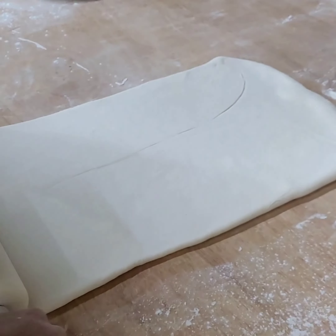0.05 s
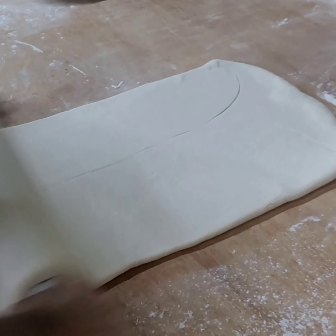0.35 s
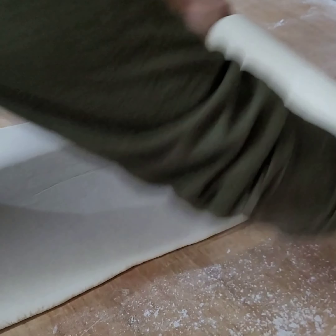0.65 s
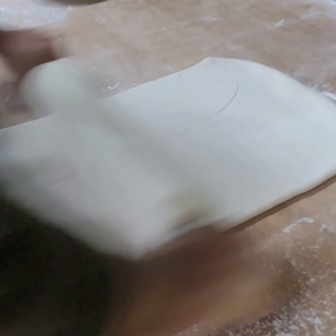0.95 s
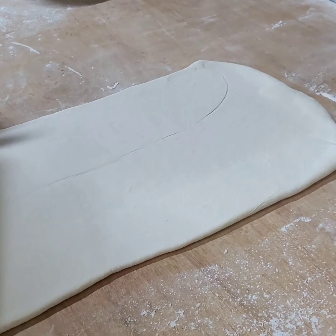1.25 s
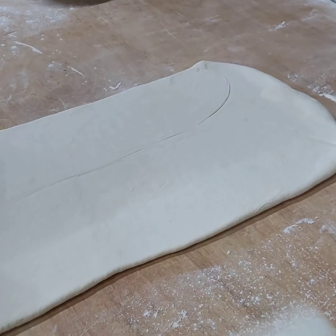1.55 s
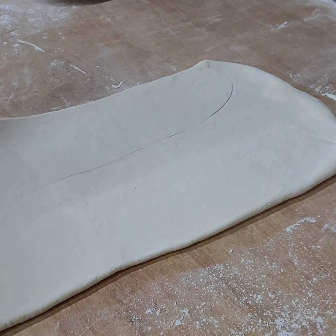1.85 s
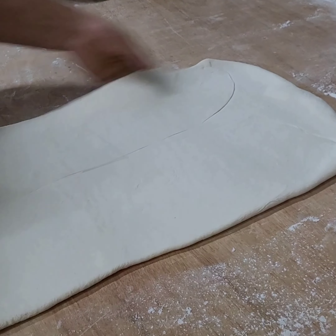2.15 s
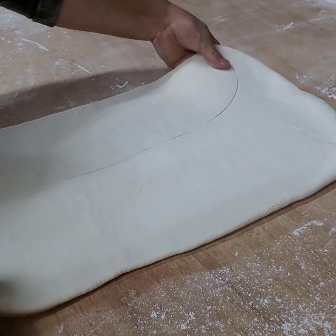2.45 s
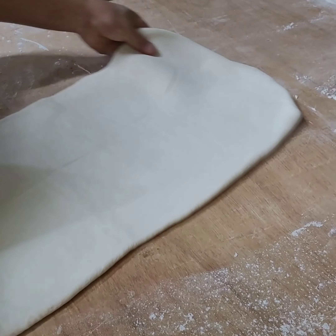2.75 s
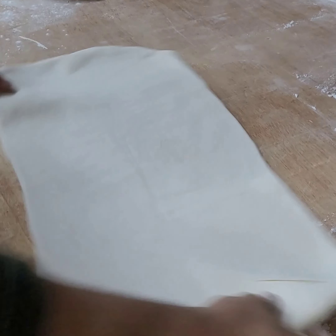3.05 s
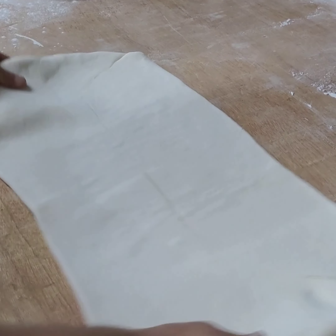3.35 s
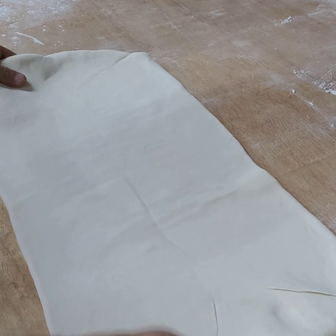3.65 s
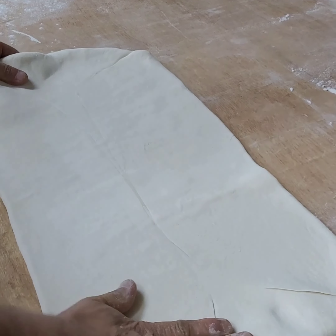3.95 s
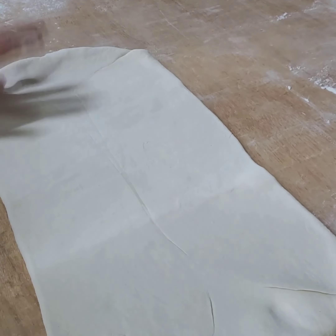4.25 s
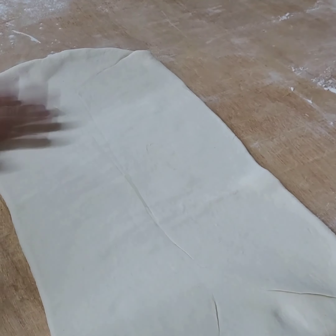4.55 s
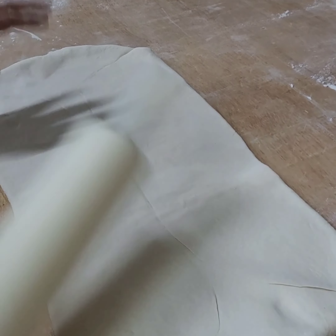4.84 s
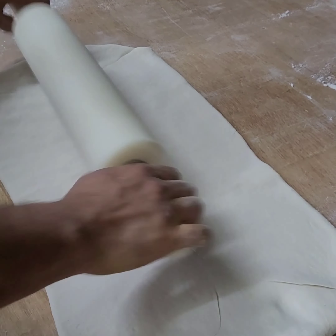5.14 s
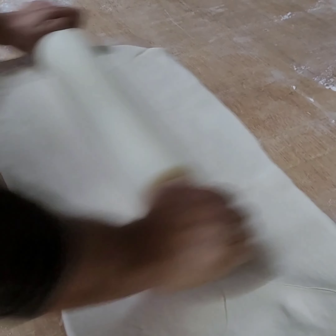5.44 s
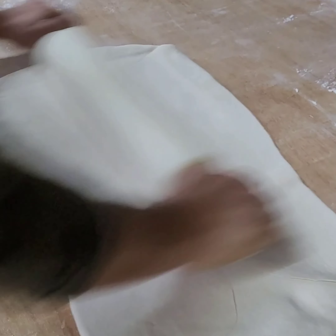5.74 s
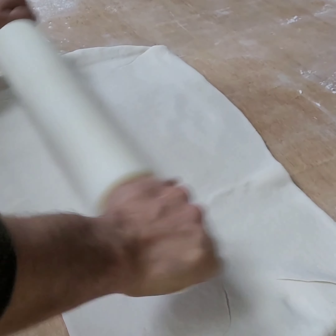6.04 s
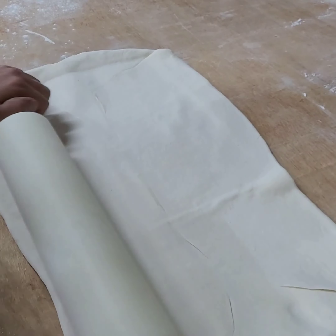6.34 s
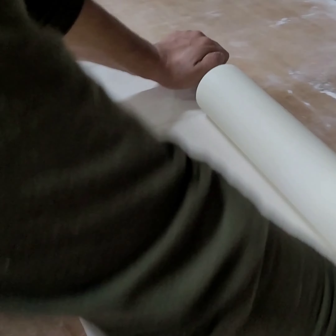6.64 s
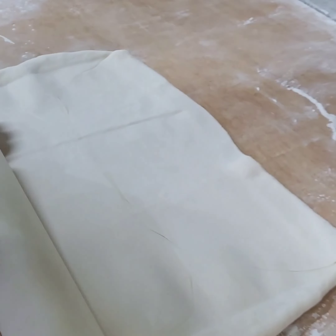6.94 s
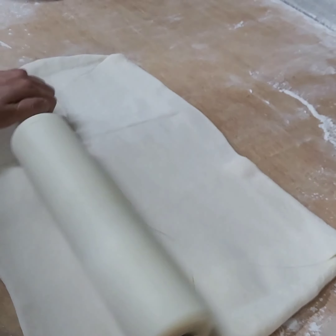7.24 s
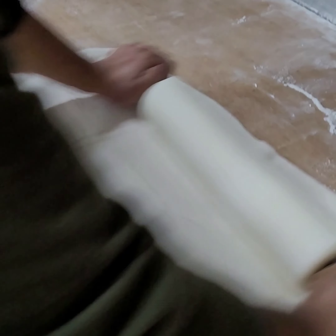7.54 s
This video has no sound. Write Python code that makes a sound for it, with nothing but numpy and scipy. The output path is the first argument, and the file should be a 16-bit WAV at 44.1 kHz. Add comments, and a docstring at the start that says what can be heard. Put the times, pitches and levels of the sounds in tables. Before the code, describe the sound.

Heard from nearby in a small, hard-walled kitchen, dough is rolled out on a wooden table. A few rubbing strokes and light taps lead to a clattering knock of the rolling pin. After a quieter stretch of sliding over flour, pin and dough land several times with a slap and a thud, mixed toward the end with brief gritty rolls and clicks. An appliance hums faintly throughout.

```python
"""Rolling out dough

A wooden rolling pin works floured dough on a wooden table in a small, hard-walled kitchen.
The pin lands with a slap and a thud of the table, and rolls with a gritty rub and sticky clicks.
Between strokes, hands and dough slide over the flour. The room echoes, and an appliance hums."""
import sys
import numpy as np
from scipy import signal
from scipy.fft import rfft, irfft, next_fast_len
from scipy.io import wavfile

SR = 44100
rng = np.random.default_rng(int(sys.argv[2]) if len(sys.argv) > 2 else 0)


def wrap_up_sound(samples):
    """Save the sound to the file named by the first command line argument, as 16-bit audio."""
    columns = np.atleast_2d(samples).T
    # keep every value between -1 and 1, then stretch to whole-number steps
    tamed = np.clip(columns, -1, 1)
    steps = np.round(tamed * 32767).astype(np.int16)
    wavfile.write(sys.argv[1], SR, steps)


N = 334719
TIME = np.arange(N) / SR
TAPS = 4096  # samples in a filter or a short sound
HZ = np.fft.rfftfreq(TAPS, 1 / SR)
# the pin's own notes, damped by hands and dough: f/Hz, width/Hz, level/dB
PIN_NOTES = [(1684.6, 320, 4.5), (2594, 650, 1), (4430, 930, 3), (5130, 700, 1.5)]


def knocks(low_hz=150, spot_t60=0.031, chatter_t60=0.22, slap_delay_s=0.001013, room_db=-1):
    """A blow makes the table ring; the longer the dough cushions it, the duller the thud."""
    # pin or hand lands: t/s, thud/dB, extra bass/dB, contact/ms, ring of the struck spot/Hz, ring/dB,
    # chatter/dB, slap/dB, slap fade/ms, slap brightness/(dB per octave)
    landings = [(0.269, -21, 6, 0.5, 440, -30, -32, -42, 3.1, 4),
                (1.475, -37, 13, 0.44, 1080, -30, -32, -20, 7.6, 2.5),
                (1.726, -11, -33, 0.14, 265, -5.5, -15, -30, 8.8, 9),
                (1.729, -17, -12, 0.26, 536, -7, -14, -21, 6.7, 6.5),
                (3.8716, -4.5, -10, 0.57, 279, -6.5, -22, -18, 7.4, -2.5),
                (4.3378, -3.5, -12, 0.84, 394, -12, -23.5, -21, 5.8, -3),
                (4.607, -10, -9, 0.37, 626, -15, -26.5, -23.5, 4.2, -2.5),
                (5.2526, -4, 2.5, 0.85, 336, -14, -25.5, -18, 5.6, -0.3),
                (6.272, -2, 1.5, 0.78, 300, -2, -28, -16, 12, -3.5),
                (7.2758, -4.5, -0.5, 0.88, 323, -14.5, -26.5, -17.5, 12.6, 0)]
    # notes of the table and the air around it: f/Hz, level/dB, t60/s (time to fade by 60 dB)
    table_notes = [(53.5, -28.5, 1.7), (62.7, -14, .14), (102.83, -13.5, 0.7), (133.3, -20, .3),
                   (179.6, -25.5, 0.61), (202.4, -4, 0.026), (253.3, -14.5, 0.32), (285, -1.5, 0.042),
                   (381, -24, 0.22), (468, -24, 0.098), (522, -38, 0.089), (585.6, -23, 0.11),
                   (706, -9, 0.034), (780, -23, 0.16), (1046, -60, 0.073), (1370, -14, 0.082)]
    # tone of the pin chattering on the wood: f/Hz, level/dB
    chatter_tone = [(40, -26.5), (130, -30), (260, -5.5), (400, -2.5), (620, -9), (950, -14.5), (1350, -14),
                    (2500, -27), (6000, -36.5), (16000, -89)]
    out, t = np.zeros((2, N)), np.arange(SR) / SR
    hz, note_db, t60 = np.transpose(table_notes)[:, :, None]
    notes = amp(note_db - 60 * t / t60) * np.sin(2 * np.pi * hz * t)
    lowness = 1 / (1 + (hz / low_hz) ** 4)
    chatter_fade = np.exp(-np.log(1000) * t[:SR // 2] / chatter_t60)
    lead = TAPS / SR / 4  # the dough touches just before the pin bears down
    slap_at = lead + slap_delay_s
    for (s, thud_db, bass_db, contact_ms, spot_hz, spot_db,
         chatter_db, slap_db, slap_ms, tilt) in landings:
        push = t[:TAPS] * 1000 / contact_ms
        force = push * np.exp(-push)
        ring = (notes * amp(bass_db * lowness)).sum(0)
        thud = signal.oaconvolve(ring, force / force.sum())[:SR]
        chatter = colour(noise(SR // 2) * chatter_fade, read(chatter_tone))
        blow = np.zeros((2, SR))
        add(blow, lead, amp(thud_db) * thud)
        add(blow, lead, amp(spot_db) * ping(spot_hz, spot_t60))
        add(blow, slap_at, amp(slap_db) * clack())
        add(blow, lead, amp(chatter_db) * chatter)
        add(blow, *smack(slap_at, slap_db, slap_ms, slap_shape(tilt), rise_ms=4 * contact_ms))
        add(out, s - lead, kitchen(blow, room_db))  # each spot has its own paths through the room
    return out


def clack(clack_db=-4):
    """The pin bends and rings very briefly; the wider a note, the sooner it dies."""
    notes = (amp(db) * ping(hz, np.log(1000) / (np.pi * width)) for hz, width, db in PIN_NOTES)
    return amp(clack_db) * sum(notes)


def smack(s, db, fade_ms, shape_db, rise_ms):
    """Dough lands patch by patch in a quick burst of noise. Returns start time and sound."""
    lead = TAPS // 8
    ms = (np.arange(TAPS) - lead) * 1000 / SR
    swell = np.exp(np.minimum(ms / rise_ms, -ms / fade_ms))
    spectrum = rfft(diffuse(swell * rng.standard_normal((2, TAPS)), shared=0.087))
    burst = irfft(spectrum / abs(spectrum))  # equal strength at every pitch
    burst *= swell ** (1 / 4)
    burst *= np.linalg.norm(swell) / np.linalg.norm(burst[0])
    return s - lead / SR, amp(db) * colour(burst, shape_db)


def slap_shape(tilt):
    """The tone of a slap, in dB: it rings the pin, and a sharper one is brighter."""
    # dough slapping down: f/Hz, level/dB
    slap_tone = [(100, -39.5), (500, -8), (900, 1), (1700, -3), (2700, -0.5), (3500, -5), (4700, -7.5),
                 (7000, -10), (9000, -14), (11500, -5.5), (14000, -9), (18000, -12.5)]
    return read(slap_tone) + pin_colour() + tilt * np.log2(HZ + 1)


def pin_colour():
    """The boost, in dB, that the pin gives to pitches near its own notes."""
    return sum(db / (1 + (2 * (HZ - hz) / width) ** 2) for hz, width, db in PIN_NOTES)


def rolling(rub_db=-1, flour_db=3, rumble_db=-6, sway_db=-27):
    """The pin rubs the dough and crushes flour; the table rumbles and sways under its weight."""
    # pushes and pulls: t/s at full speed, length/s, level/dB, change for the flour's hiss/dB
    rolls = [(0.0, 0.1, -39, -8.5), (0.558, 0.27, -36, -11), (1.022, 0.29, -34.5, -9),
             (5.506, 0.2, -41, -13), (5.801, 0.16, -39, -10.5), (6.137, 0.37, -51.5, -7.5),
             (6.563, .19, -44, -10.5), (6.87, 0.16, -40, -12), (7.539, 0.19, -45.5, -13.5)]
    # tones of rubbed dough, crushed flour, table rumble and table sway: f/Hz, level/dB
    rub_tone = [(200, -28), (450, -36), (560, -6.5), (900, 3), (1350, -3), (1850, -3), (2700, -5.5),
                (3700, -12), (6000, -22.5), (9000, -38), (16000, -34)]
    flour_tone = [(1500, -20), (4000, -5), (6500, 3), (9000, -7), (12500, 5), (16000, 3.5)]
    rumble_tone = [(25, -44), (55, -8), (80, 1), (103, -4.5), (140, -7.5), (215, 2.5), (280, 2.5),
                   (400, 0.5), (520, -8.5), (1000, -9), (4000, -71)]
    sway_tone = [(25, 15.5), (40, 3), (53, 6.5), (70, -3), (85, -16), (104, 7), (140, -7), (400, -31)]
    effort, crush = np.zeros((2, N))
    for s, length, db, hiss_db in rolls:
        arch = amp(db) * stroke(s, length, end_db=-10.5)
        effort += arch
        crush += amp(hiss_db) * arch
    rub = colour(grit(per_s=600, spread_db=5.0, share=0.38), read(rub_tone) + pin_colour()) * effort
    flour = colour(grit(per_s=280, spread_db=4.5, share=0.46), read(flour_tone)) * crush
    rumble = colour(noise(N), read(rumble_tone)) * effort ** 0.83
    sway = colour(noise(N), read(sway_tone)) * effort ** 0.29
    return amp(rub_db) * rub + amp(flour_db) * flour + amp(rumble_db) * rumble + amp(sway_db) * sway


def clicks(tock_db=-10, tock_t60=0.011):
    """Pin and dough tap and stick: small smacks, each with a short woody tock."""
    # light touches: t/s, level/dB, ring/Hz, ring boost/dB, brightness/(dB per octave)
    touches = [(0.028, -37.5, 4340, 17, 3.5), (0.142, -26, 1550, 9, -1), (0.268, -21.5, 1660, 15.5, -2.5),
               (0.346, -35, 4960, 4, 1), (0.456, -30, 1960, 9, -3.5), (0.637, -31, 12600, 4, 2.5),
               (0.896, -30, 4600, 3, -2.5), (0.962, -30, 1910, 18, 1), (1.051, -27, 5500, 1, 1),
               (1.226, -26.5, 1480, 4, 2.5), (4.526, -25, 650, 14, -1.5), (5.039, -37.5, 5100, 10, 1),
               (5.067, -36.5, 2550, -11, 0), (5.989, -38, 4330, 7, -0.5), (6.029, -23, 1430, 6, 0.5),
               (6.161, -37.5, 11400, 8, 1), (6.532, -33, 1990, 13, -1.5), (6.734, -44, 3960, 9, -1.5),
               (6.972, -40, 4400, 12, 1), (7.1, -22, 2570, 3, 0), (7.2803, -22.5, 4400, 2, -0.7)]
    out = np.zeros((2, N))
    for s, db, hz, ring_db, tilt in touches:
        tone = slap_shape(tilt) + ring_db * bump(hz)
        add(out, *smack(s, db, fade_ms=4.26, shape_db=tone, rise_ms=2.45))
        add(out, s, amp(db + ring_db + tock_db) * ping(hz, tock_t60))
    return out


def sliding(slide_db=5, drag_db=-29, scrape_db=4):
    """Hands and dough swish softly over the flour, with a low drag through the table."""
    # each slide: t/s at full speed, length/s, level/dB, pitch of the scrape/Hz
    slides = [(0.374, 0.22, -55.5, 1900), (1.263, 0.39, -60, 1870), (2.137, 0.27, -61.5, 1200),
              (2.396, 0.099, -69, 1490), (2.693, 0.099, -57, 12000), (3.052, 0.36, -50, 5030),
              (3.433, 0.18, -53, 3230), (3.692, 0.25, -57.5, 12800), (4.13, 0.099, -61, 13200),
              (4.5, 0.1, -56, 1500), (5.115, 0.42, -57, 4500), (7.187, 0.062, -50, 11530)]
    # tones of the swish and the drag: f/Hz, level/dB
    swish_tone = [(100, 4), (300, -6), (700, 2), (1500, 3), (3000, 0), (5000, -3.5), (7000, -5.5),
                  (9000, -11.5), (11500, -2), (16000, -3.5)]
    drag_tone = [(40, -46), (100, 4), (160, -5.5), (220, 0), (350, -5), (600, -9), (800, -9), (2000, -28.5)]
    friction = grit(per_s=5300, spread_db=7.5, share=0.098)
    swish, effort = np.zeros((2, N)), np.zeros(N)
    for s, length, db, hz in slides:
        arch = amp(db) * stroke(s, length, end_db=-8)
        heard = np.flatnonzero(abs(TIME - s) < 2 * length)
        tone = read(swish_tone) + scrape_db * bump(hz)
        swish[:, heard] += colour(friction[:, heard], tone) * arch[heard]
        effort += arch
    drag = colour(noise(N), read(drag_tone)) * effort ** 0.42
    return amp(slide_db) * swish + amp(drag_db) * drag


def stroke(s, length, end_db):
    """The hand speeds up and slows down, so the level follows an arch that peaks at time s."""
    return amp(np.maximum(end_db * (2 * (TIME - s) / length) ** 2, -200))


def grit(per_s, spread_db, share):
    """Smooth rubbing noise plus grains of uneven size, which carry the given share of the power."""
    hits = rng.random((2, N)) < per_s / SR
    signs = rng.choice([-1, 1], (2, N))
    sizes = amp(spread_db * np.minimum(rng.exponential(1, N), 4))
    grains = hits * signs * sizes
    grains /= np.sqrt(np.mean(grains ** 2) + 1e-20)
    smooth = rng.standard_normal((2, N))
    return diffuse(np.sqrt(share) * grains + np.sqrt(1 - share) * smooth, shared=0.25)


def kitchen(pair, room_db, build_s=0.0012, echo_hz=1500):
    """The sound itself, a few dull echoes, then a tail whose high pitches die sooner."""
    # bounces off walls and ceiling: t/s, level/dB
    bounces = [(.0052, -21.5), (0.0149, -7.5), (0.0296, -12.5), (0.06, -36)]
    # how long the tail lasts: f/Hz, t60/s
    tail_fade = [(100, 0.75), (260, 0.48), (700, 0.81), (1840, 0.51), (4850, 0.41), (9000, 0.26),
                 (16000, 0.32)]
    # tone of the tail: f/Hz, level/dB
    tail_tone = [(50, -22), (130, 5.5), (300, 4), (800, -6), (3000, -3.5), (8000, -0.5), (17000, -8)]
    size = SR // 2
    hz, t, bands = signal.stft(noise(size), SR, nperseg=256)
    rate = np.log(1000) / read(tail_fade, hz)[:, None]
    fade = np.sqrt(2 * rate / SR) * np.exp(-rate * t)  # same energy, long or short
    bands = bands * amp(read(tail_tone, hz))[:, None] * fade
    tail = signal.istft(bands, SR, nperseg=256)[1][:, :size]
    tail *= 1 - np.exp(-TIME[:size] / build_s)
    echoes = np.zeros(size)
    for s, db in bounces:
        add(echoes, s, amp([db]))
    response = amp(room_db) * tail + signal.lfilter(*signal.butter(1, echo_hz, fs=SR), echoes)
    return pair + signal.fftconvolve(pair, response, axes=1)[:, :pair.shape[1]]


def background(air_db=-50, waver=0.92):
    """The room murmurs and an appliance hums, each of its notes wavering at random."""
    # tone of the still kitchen, and notes of the hum: f/Hz, level/dB
    air_tone = [(25, -46), (60, -12), (103, -4), (160, -13.5), (230, 0.5), (330, 1.5), (550, -9),
                (1000, -12), (2000, -17.5), (4500, -22), (9000, -33), (12000, -30), (16000, -44)]
    hum_notes = [(53.2, -65), (106.3, -58.5), (212.6, -57), (319, -57), (423, -62.5), (499, -70)]
    turns = np.linspace(0, TIME[-1], num=N // 8192)
    hum = np.zeros(N)
    for hz, db in hum_notes:
        nudges = rng.standard_normal(len(turns)) + 1j * rng.standard_normal(len(turns))
        wobble = 1 + waver * np.interp(TIME, turns, nudges)
        hum += np.sqrt(2) * amp(db) * (wobble * np.exp(2j * np.pi * hz * TIME)).real
    return amp(air_db) * colour(noise(N), read(air_tone)) + hum


def ping(hz, t60):
    """One note that fades by 60 dB in t60 seconds."""
    t = TIME[:TAPS]
    return np.sin(2 * np.pi * hz * t) * np.exp(-np.log(1000) * t / t60)


def noise(size):
    """White noise from all sides."""
    return diffuse(rng.standard_normal((2, size)))


def diffuse(pair, shared=0, spacing_m=0.17):
    """Sound from all sides: two spaced microphones share the bass but little of the treble."""
    size = next_fast_len(pair.shape[1], real=True)
    a, b = rfft(pair, size)
    same = np.sinc(2 * np.fft.rfftfreq(size, 1 / SR) * spacing_m / 343)  # sound travels 343 m/s
    turn = np.arccos(np.clip(shared + (1 - shared) * same, -1, 1)) / 2
    mid, side = a * np.cos(turn), b * np.sin(turn)
    return irfft(np.array([mid + side, mid - side]), size)[:, :pair.shape[1]]


def colour(pair, db):
    """Gives a sound the tone curve db; white noise keeps its power."""
    log_gain = np.log(amp(np.r_[db, db[-2:0:-1]]))
    taps = np.fft.ifft(np.exp(np.conj(signal.hilbert(log_gain)))).real  # rings only after a hit
    return signal.oaconvolve(pair, taps[None] / np.linalg.norm(taps), axes=1)[:, :pair.shape[1]]


def bump(hz, width_octaves=0.25):
    """A broad hump of height 1 on a tone curve."""
    return 1 / (1 + (np.log2((HZ + 1) / hz) / width_octaves) ** 2)


def read(points, hz=HZ):
    """Joins a table's points into a curve, on a scale of octaves."""
    f, value = np.transpose(points)
    return np.interp(np.log(hz + 1), np.log(f + 1), value)


def amp(db):
    """Turns decibels into a multiplier."""
    return 10 ** (np.asarray(db) / 20)


def add(mix, s, sound):
    """Mixes a sound in at time s."""
    part = mix[..., max(round(s * SR), 0):][..., :sound.shape[-1]]
    part += sound[..., :part.shape[-1]]


def scene():
    """All the work at the table, heard in the kitchen."""
    hits = knocks() + kitchen(clicks(), room_db=-3.0)
    strokes = kitchen(rolling() + sliding(), room_db=0.5)
    return hits + strokes + background()


def record(dry, low_cut_hz=39, high_cut_hz=16150):
    """The microphones lose the lowest and highest pitches and round off peaks; the left is duller."""
    # balance of the microphones: f/Hz, left minus right/dB
    balance = [(60, -4), (150, -0.5), (350, -4), (700, -0.5), (1300, -1.5), (2400, 0), (4400, 1),
               (8000, -4), (12000, -7.5), (16000, -6.5)]
    size = next_fast_len(N, real=True)
    lean_db = read(balance, np.fft.rfftfreq(size, 1 / SR))
    gains = amp(np.array([lean_db, -lean_db]) / 2)
    gains /= np.sqrt(np.mean(gains ** 2, axis=0))
    heard = irfft(rfft(dry, size) * gains, size)[:, :N]
    heard = signal.sosfilt(signal.butter(5, low_cut_hz, "high", fs=SR, output="sos"), heard)
    rounded = heard / (1 + heard ** 6) ** (1 / 6)
    high_cut = signal.firwin(511, high_cut_hz, window=("kaiser", 8), fs=SR)
    return signal.oaconvolve(rounded, high_cut[None], "same")


dry = scene()
out = record(dry)
wrap_up_sound(out)
```